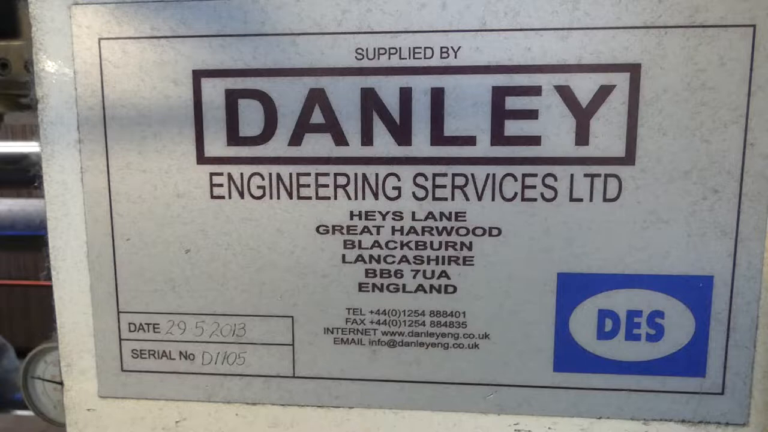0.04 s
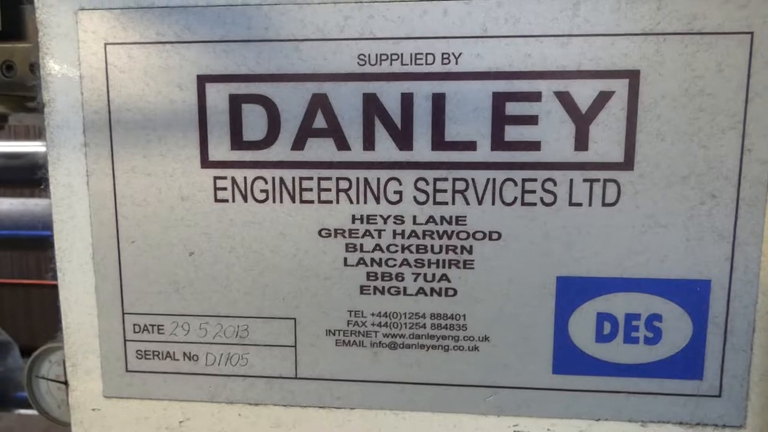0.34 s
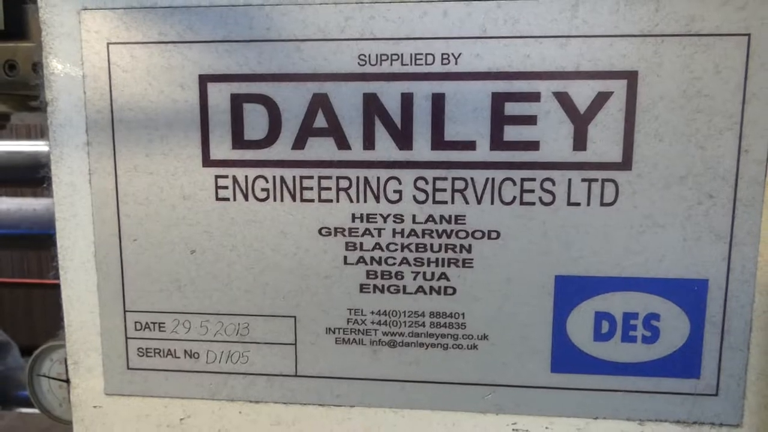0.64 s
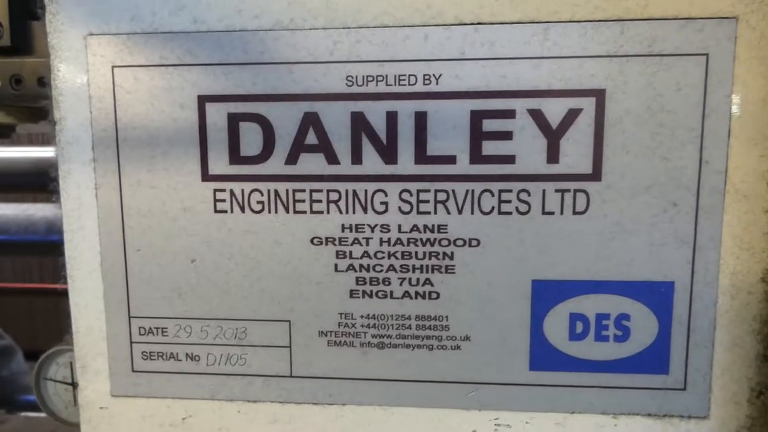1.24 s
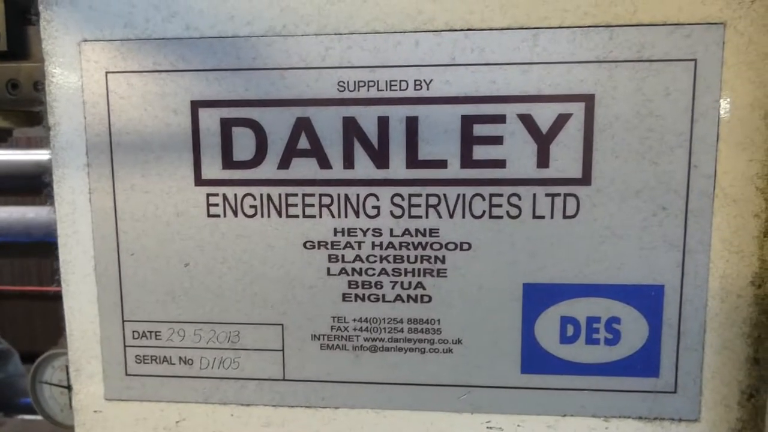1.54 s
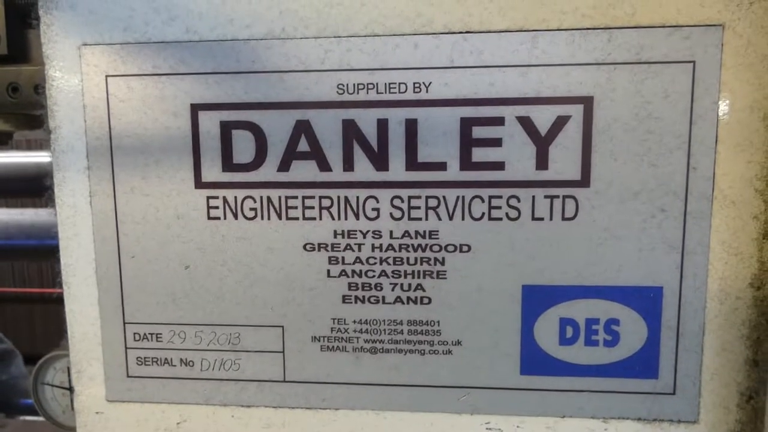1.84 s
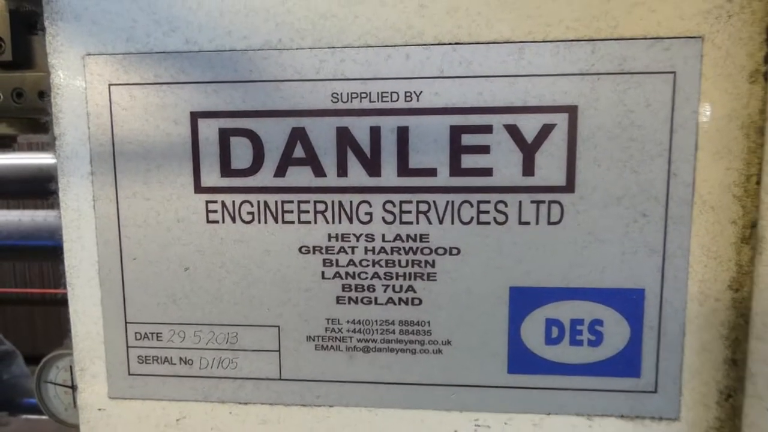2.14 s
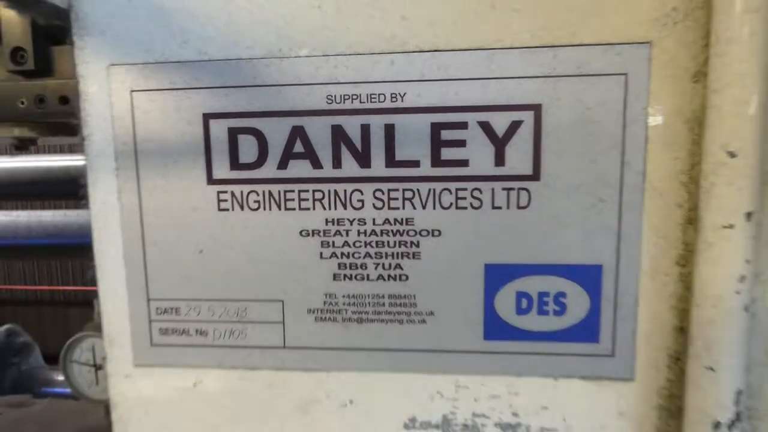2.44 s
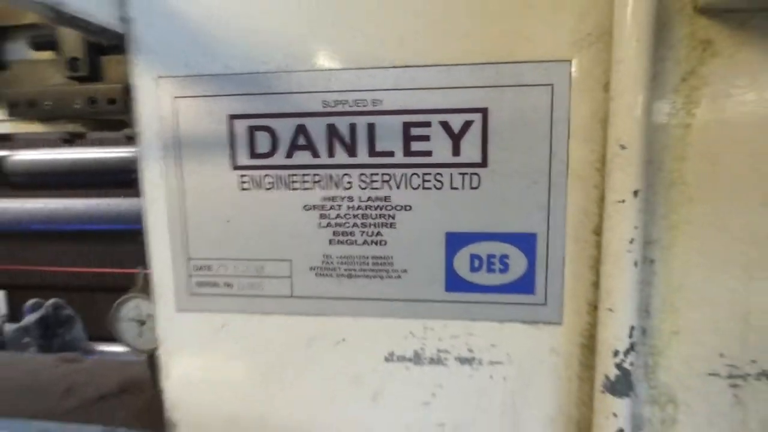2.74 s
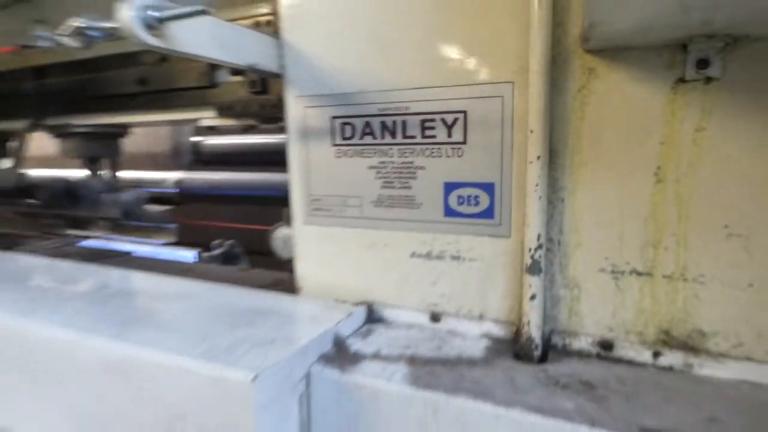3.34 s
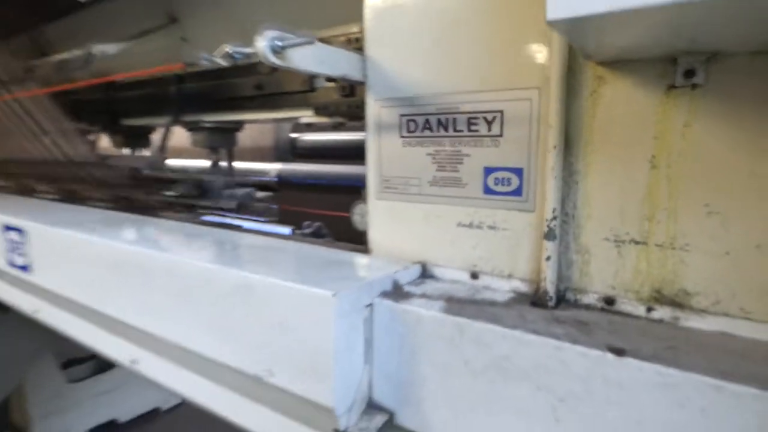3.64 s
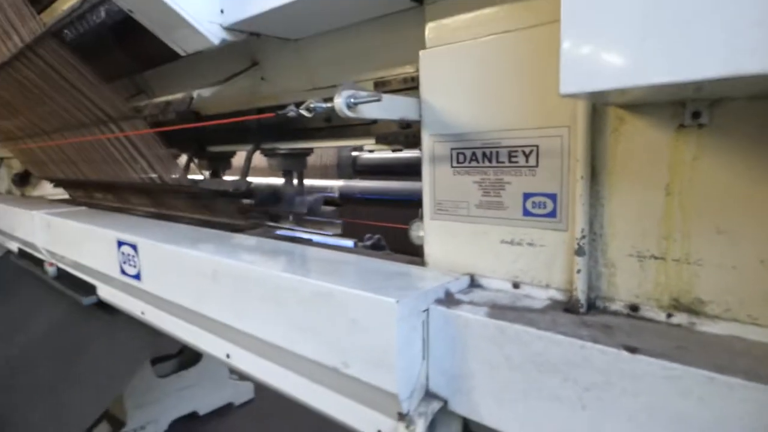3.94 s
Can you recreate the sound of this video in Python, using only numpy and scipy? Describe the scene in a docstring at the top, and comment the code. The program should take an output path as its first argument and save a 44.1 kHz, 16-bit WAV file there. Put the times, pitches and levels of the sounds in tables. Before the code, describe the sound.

A loom cuts in at 0.3 seconds, close by, clattering about eleven strokes a second with knocks, rattling panels, ringing steel ticks and yarn hiss. Its drive hums, while another machine thuds dully within a large hall's steady roar. Faint, high squeaks come between 1.8 and 2.3 seconds. Around 3 seconds the microphone steps back; the boom and panel ringing ease as the loom runs on until about 4 seconds.

```python
"""A loom at about eleven strokes a second in a large hall, the microphone beside its frame.
Each stroke repeats the same knocks and rattle, with a hiss of yarn, ringing panels, light steel clicks
and a ringing tick; a guide squeaks now and then. The drive and frame hum. A slightly slower machine
thuds nearby and the hall blurs all into a roar. Late on, the microphone moves a step back."""
import sys
import numpy as np
from scipy import signal
from scipy.fft import rfft, irfft
from scipy.io import wavfile

SR = 44100
rng = np.random.default_rng(int(sys.argv[2]) if len(sys.argv) > 2 else 0)


def log_audio(samples):
    """Write samples as a 16-bit WAV file to the path given in sys.argv[1]."""
    # one column per channel
    frames = np.atleast_2d(samples).T
    # limit to full scale, then quantise
    limited = np.clip(frames, -1, 1)
    pcm = np.round(limited * 32767).astype(np.int16)
    wavfile.write(sys.argv[1], SR, pcm)


N = 176400
T = np.arange(N) / SR
HZ = np.maximum(np.fft.rfftfreq(N, 1 / SR), 1)
STROKE_HZ = 11.313

# colour of the noise that is new in every stroke: frequency_hz, gain_db
FRESH_COLOUR = [(60, -8), (200, -7), (2000, 0)]
# hum of drive and frame, close by and a step back: stroke_multiple (rounded in use), near_db, far_db
HUM_TONES = [(7, -49.5, -44), (12, -37, -31.5), (14, -35.5, -34.5), (15, -34, -35.5), (17, -32.5, -37),
             (18, -40.5, -30.5), (20, -26.5, -26.5), (22, -30, -26.5), (23, -33.5, -38), (24, -32.5, -40),
             (31, -43, -38), (32, -33, -48), (40, -34.5, -51), (52, -38, -40), (75.14, -39, -51)]


def amp(db):
    """Decibels to gain."""
    return 10 ** (np.asarray(db) / 20)


def curve(rows, at_s=T):
    """Read rows of (time_s, value) at the given times."""
    return np.interp(at_s, *np.array(rows).T)


def response(rows):
    """Rows of (frequency_hz, gain_db) as a gain at every frequency."""
    hz, db = np.array(rows).T
    return amp(np.interp(np.log(HZ), np.log(hz), db))


def shape(x, gain):
    """Filter by a gain per frequency."""
    return irfft(rfft(x) * gain, N)


def unit(x):
    """Scale to rms 1."""
    return x / np.sqrt(np.mean(x ** 2))


def below(hz):
    """Gain of a steep low-pass."""
    return 1 / (1 + (HZ / hz) ** 6)


def band(hz, width_hz):
    """Gain of a flat-topped band-pass."""
    return np.exp(-(2 * (HZ - hz) / width_hz) ** 4)


def walk(hold_s):
    """A smooth random wander of rms 1."""
    return unit(shape(rng.standard_normal(N), np.exp(-(HZ * hold_s) ** 2)))


def stereo(pair):
    """Mid and side to left and right; the treble is the more diffuse."""
    # side against mid: frequency_hz, gain_db
    width = [(30, -3), (65, -13.5), (250, -13), (600, -10), (1300, -7.5), (5000, -9), (9000, -6),
             (13000, -1.5)]
    side = shape(pair[1], response(width))
    return np.array([pair[0] + side, pair[0] - side])


def clatter(rate_hz, skip=()):
    """One machine turn of dense clatter, repeated, without the harmonics in skip."""
    size = 8192
    orders = np.arange(size // 2 + 1)
    kept = (orders * rate_hz < SR / 2) & ~np.isin(orders, skip)
    turn = irfft(np.exp(2j * np.pi * rng.random(len(orders))) * kept)
    return unit(np.interp(T * rate_hz % 1 * size, np.arange(size), turn))


def swell(at_s, width_s, height_db):
    """A rise in level once a stroke."""
    away_s = (((T - at_s) * STROKE_HZ + .5) % 1 - .5) / STROKE_HZ
    return unit(amp(height_db * np.exp(-(away_s / width_s) ** 2)))


def hall(roar_db=-22, neighbour_db=-34.5, neighbour_hz=10.82):
    """The blurred roar of the hall and the dull beat of the next machine."""
    # colour of the next machine: frequency_hz, gain_db
    dull = [(60, -26), (140, 7), (320, 14.5), (800, -2.5), (2000, -8)]
    roar = amp(roar_db) * shape(rng.standard_normal((2, N)), response(FRESH_COLOUR))
    neighbour = np.array([clatter(neighbour_hz) for _ in range(2)])
    return roar + amp(neighbour_db) * shape(neighbour, response(dull))


def hum(crest_s=.033, scatter_rad=.91, drift_rad=.32, waver_db=1.0, step_at_s=2.9, step_takes_s=1):
    """Drive and frame hum on multiples of the stroke rate, cresting near the main knock."""
    closeness = np.clip(.5 - (T - step_at_s) / step_takes_s, 0, 1)  # 1 at the frame, 0 a step back
    out = 0
    for multiple, near_db, far_db in HUM_TONES:
        level_db = far_db + (near_db - far_db) * closeness + waver_db * walk(.28)
        phase = 2 * np.pi * round(multiple) * STROKE_HZ * (T - crest_s)
        phase += scatter_rad * rng.standard_normal() + drift_rad * walk(.96)
        out += np.sqrt(2) * amp(level_db) * np.cos(phase)
    return out


def squeaks(width_s=.016, wobble=.011):
    """A dry guide chirps briefly, with its octave."""
    # chirps of the guide: centre_s, pitch_hz, level_db, octave_db
    chirps = [(.415, 3738, -46, -33), (1.796, 3758, -27, -36), (1.888, 3850, -35, -58),
              (1.98, 3900, -35, -58), (2.066, 3730, -34, -46), (2.243, 3780, -32, -50),
              (2.332, 3790, -30.5, -58)]
    wobbly_time = np.cumsum(1 + wobble * walk(.003)) / SR
    out = 0
    for at, hz, db, octave_db in chirps:
        phase = 2 * np.pi * hz * wobbly_time
        envelope = np.exp(-(2 * (T - at) / width_s) ** 2)
        out += envelope * (amp(db) * np.sin(phase) + amp(octave_db) * np.sin(2 * phase))
    return out


def panels(level_db=-32):
    """Each stroke shakes the steel panels, which ring briefly close to the microphone."""
    # panel resonances: pitch_hz, width_hz, level_db
    modes = [(846.4, 32, 8.5), (1400, 37, 0), (1533, 28, 4.5), (1612, 20, 1.5), (2330, 51, -1.5),
             (2540, 41, 0), (3950, 81, -9)]
    # the panels as the microphone moves: time_s, gain_db
    levels = [(1.0, -3.5), (1.15, -1), (2.8, -4), (3.1, -17)]
    ring = sum(amp(db) / np.sqrt(width) / (1 + 1j * hz / width * (HZ / hz - hz / HZ) / 2) ** 2
               for hz, width, db in modes)
    shaking = rng.standard_normal((2, N)) * swell(at_s=.017, width_s=.012, height_db=9.7)
    return amp(level_db + curve(levels)) * stereo(unit(shape(shaking, ring)))


def ticks(ring_gain_db=-27, crack_gain_db=-22.7, rise_s=.0013, crack_decay_s=.0025):
    """Steel parts ping and click through each stroke, then snap home."""
    # steel contacts within a stroke: start_s, ring_db, crack_db
    contacts = [(.018, -7, -11), (.036, -8, -20), (.0475, -16, -5), (.0518, -18, -3), (.0665, -10, -6),
                (.0713, 0, 0)]
    # strength of those contacts: time_s, gain_db
    strength = [(.4, -4), (1.78, -.5), (2.19, -3), (2.46, -.5), (2.81, -1.5), (2.95, -6), (3.43, -7),
                (3.52, -1.5), (3.9, -8)]
    # extra, louder rings in mid-stroke on three successive strokes, with no crack: start_s, level_db
    extra_rings = [(2.692, -5), (2.781, -4), (2.868, -1), (2.874, -2)]
    # ring of the steel: pitch_hz, level_db, t60_s
    modes = [(5620, -8, .035), (5780, 0, .045), (6020, -6, .035), (12500, -24.5, .045),
             (14600, -26.5, .045)]
    # colour of the dry crack: frequency_hz, gain_db
    crack_colour = [(700, -9), (2200, 2), (6000, -3), (7500, -10), (9700, -7), (11500, -23), (15000, -42)]
    # the crack softens with distance: time_s, gain_db
    crack_fade = [(2.2, 0.5), (2.8, -3.5)]
    jitter_s, scatter_db, detune = .0003, .7, .007
    strokes = np.arange(int(T[-1] * STROKE_HZ)) / STROKE_HZ
    blows = [(start + at, db + curve(strength, start + at), crack_db - db)
             for start in strokes for at, db, crack_db in contacts]
    blows += [(at, db, -np.inf) for at, db in extra_rings]
    t = T[:4096]
    attack = 1 - np.exp(-t / rise_s)
    rings, impulses = np.zeros((2, N + len(t))), np.zeros(N)
    for at, db, crack_over_ring_db in blows:
        late, hard, sharp = rng.standard_normal(3)
        i = int(np.clip((at + jitter_s * late) * SR, 0, N - 1))
        force = amp(db + scatter_db * hard)
        for hz, mode_db, t60 in modes:
            phase = 2 * np.pi * (hz * (1 + detune * sharp) * t + rng.random())
            channel_phase = .5 * rng.standard_normal((2, 1))
            envelope = force * attack * amp(mode_db - 60 * t / t60)
            rings[:, i:i + len(t)] += envelope * np.sin(phase + channel_phase)
        impulses[i] += force * amp(crack_over_ring_db)
    bursts = signal.fftconvolve(impulses, attack * np.exp(-t / crack_decay_s))[:N]
    crack = stereo(shape(rng.standard_normal((2, N)) * bursts, unit(response(crack_colour))))
    return amp(ring_gain_db) * rings[:, :N] + amp(crack_gain_db + curve(crack_fade)) * crack


def loom(alike_db=-24, fresh_db=-20.5, grain_db=2.0, knock_decay_s=.0069, knock_floor=.46):
    """Knocks in the bass, rattle in the middle, yarn hiss on top; the lows repeat most closely."""
    # colour of the part alike in every stroke: frequency_hz, gain_db
    alike_colour = [(60, -2), (300, 0), (1000, -1.5), (1700, -4), (2800, -12), (6000, -22)]
    # knocks within a stroke: start_s, strength
    blows = [(.028, 1.9), (.063, 1.0), (.074, 1.1), (.085, .8)]
    blend = np.pi / 2 * T / T[-1]  # the pattern changes slowly along the frame
    hum_orders = [round(multiple) for multiple, _, _ in HUM_TONES]
    alike = np.array([np.cos(blend) * clatter(STROKE_HZ, hum_orders)
                      + np.sin(blend) * clatter(STROKE_HZ, hum_orders) for _ in range(2)])
    fresh = rng.standard_normal((2, N)) * unit(amp(grain_db * walk(.003)))
    drive = amp(alike_db) * shape(alike, response(alike_colour))
    drive += amp(fresh_db) * shape(fresh, response(FRESH_COLOUR))
    pulses = sum(strength * np.exp(-((T - at) % (1 / STROKE_HZ)) / knock_decay_s)
                 for at, strength in blows)
    low, high = below(640), 1 - below(1840)
    knocks = shape(drive * unit(knock_floor + pulses), low)
    rattle = shape(drive * swell(at_s=.021, width_s=.010, height_db=3.4), 1 - low - high)
    yarn = shape(drive * swell(at_s=.066, width_s=.016, height_db=1.5), high)
    return knocks + rattle + yarn


def scene(treble_left_db=1.2):
    """The microphone drifts along the frame and then backs away, which shifts the bands."""
    # colour of the machines' din: frequency_hz, gain_db
    din_colour = [(25, -33), (52, -29), (66, -22), (80, -6.5), (98, -10), (116, 2), (180, 0.5), (258, 3),
                  (300, -2.5), (450, -2.5), (520, -5), (750, -7.5), (1200, -13), (1550, -17), (2100, -21.5),
                  (2600, -23), (3900, -26), (5000, -30), (6000, -30.5), (7000, -36), (8600, -39),
                  (9800, -38.5), (12000, -49), (15000, -58.5)]
    # the deep bass: time_s, gain_db
    deep = [(.35, -1.5), (2.7, -0.5), (3.3, -4.5), (4, -5.5)]
    # the frame's boom: time_s, gain_db
    boom = [(0.349, 3.2), (2.2, 4.5), (2.7, 2), (3.15, -2.5), (4, -3.5)]
    # the band just above the boom: time_s, gain_db
    upper_body = [(0.351, -6), (2.3, -4), (2.901, 2.5), (4, 0.5)]
    # the hiss as the yarn comes into the open: time_s, gain_db
    yarn_hiss = [(3.1, -0.5), (3.7, 2.5)]
    # balance of the bass: time_s, left_minus_right_db
    bass_pan = [(.35, -4), (.75, -2.5), (2.2, 0), (3.2, 0), (4, -1)]
    din = stereo(shape(loom() + hall(), unit(response(din_colour)))) + hum()
    for passband, levels in [(below(175), deep), (band(416.5, 101), boom),
                             (band(590, 97), upper_body), (band(4470, 1700), yarn_hiss)]:
        din += shape(din, passband) * (amp(curve(levels)) - 1)
    sound = din + panels() + ticks() + squeaks()
    bass = shape(sound, below(640))
    sides = np.array([[.5], [-.5]])
    return bass * amp(sides * curve(bass_pan)) + (sound - bass) * amp(sides * treble_left_db)


def record(dry, start_s=.3414, top_hz=15150):
    """Silence, then the sound cuts in abruptly; the highest treble is cut off."""
    cut_in = np.clip((T - start_s) / .002, 0, 1)
    return signal.sosfilt(signal.ellip(10, .2, 80, top_hz, fs=SR, output="sos"), dry * cut_in)


dry = scene()
out = record(dry)
log_audio(out)
```